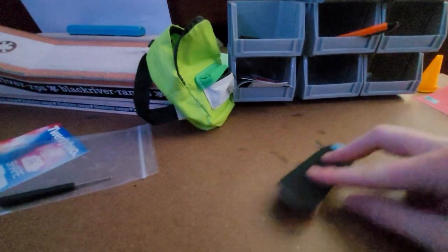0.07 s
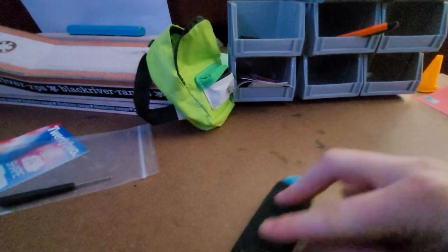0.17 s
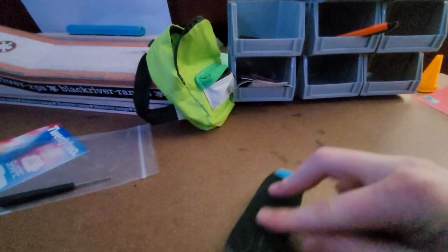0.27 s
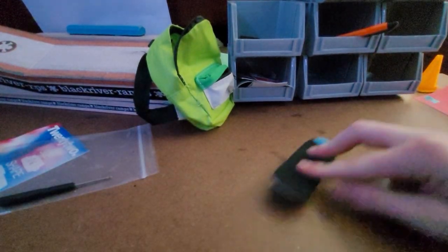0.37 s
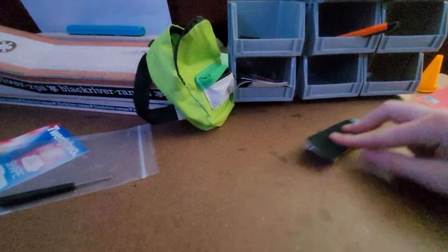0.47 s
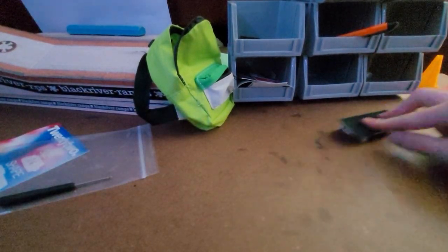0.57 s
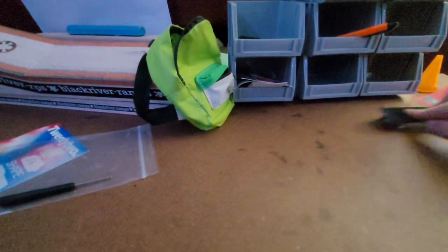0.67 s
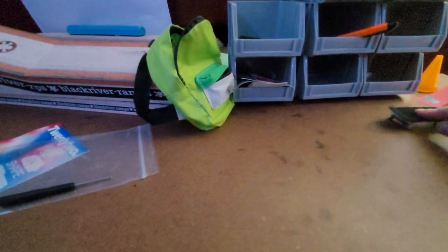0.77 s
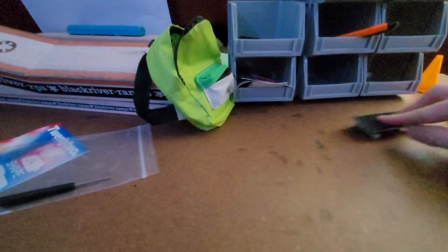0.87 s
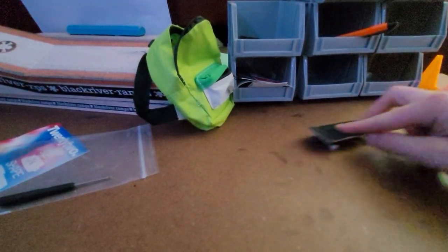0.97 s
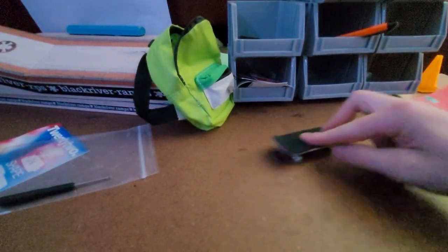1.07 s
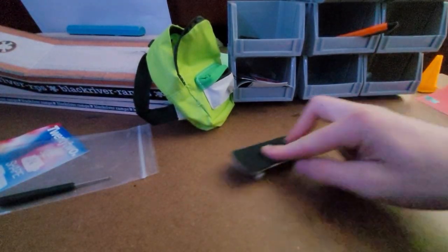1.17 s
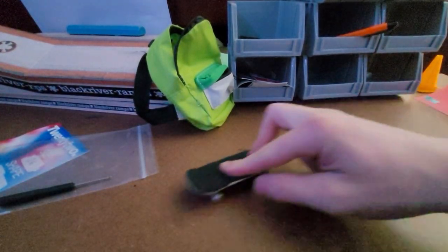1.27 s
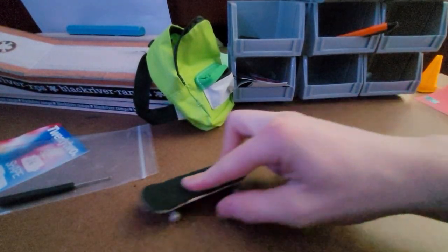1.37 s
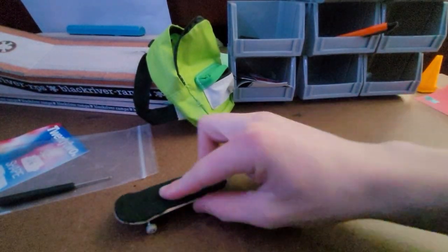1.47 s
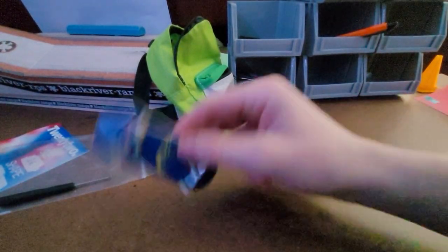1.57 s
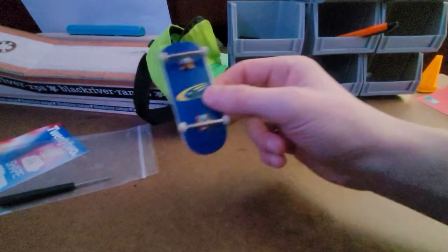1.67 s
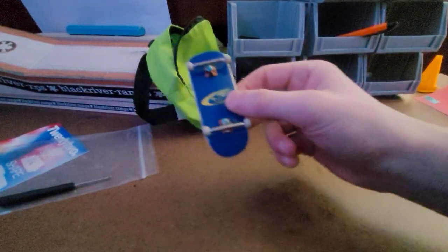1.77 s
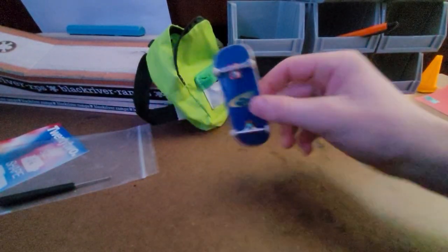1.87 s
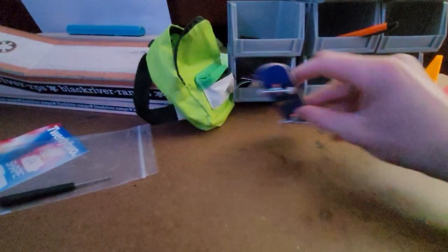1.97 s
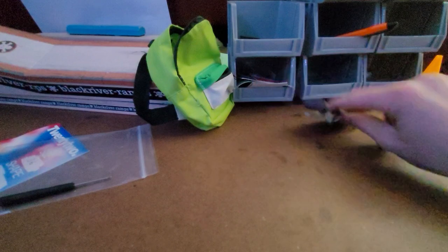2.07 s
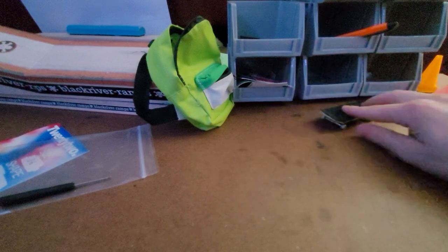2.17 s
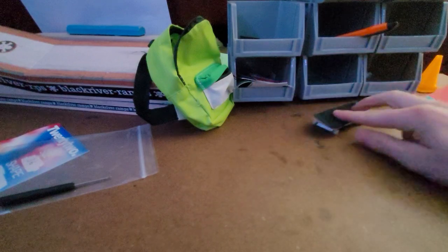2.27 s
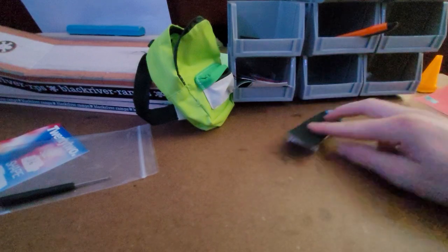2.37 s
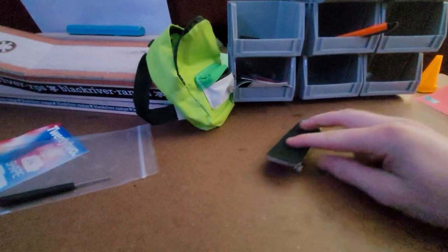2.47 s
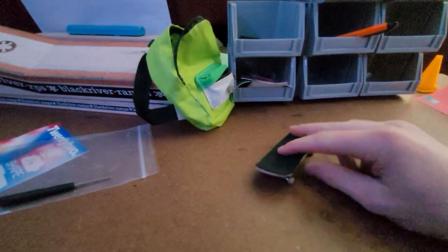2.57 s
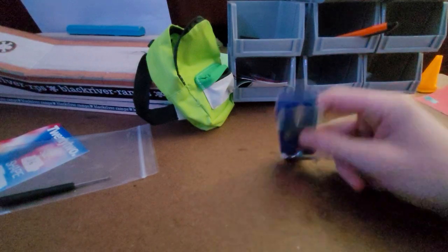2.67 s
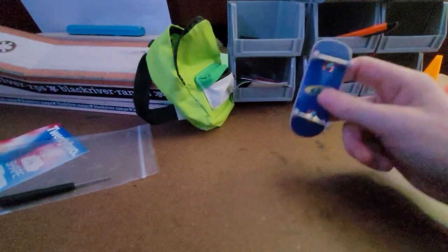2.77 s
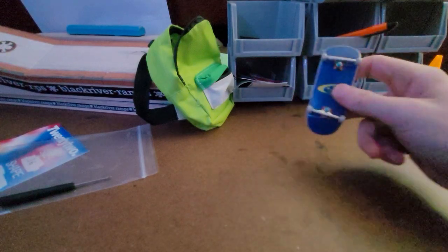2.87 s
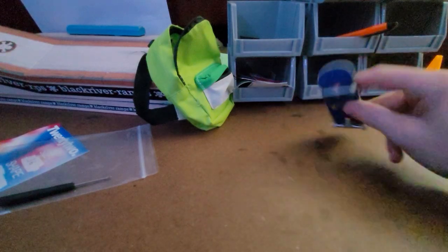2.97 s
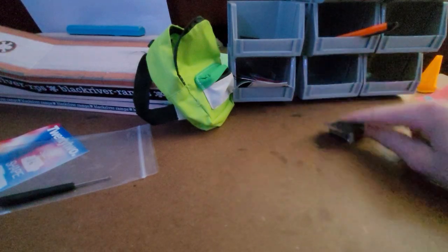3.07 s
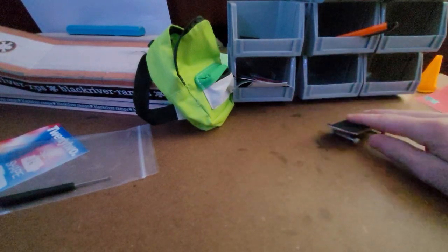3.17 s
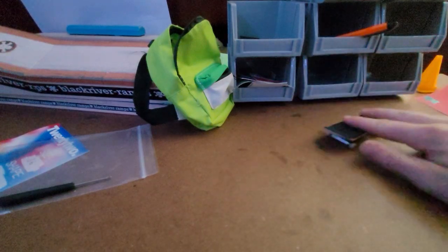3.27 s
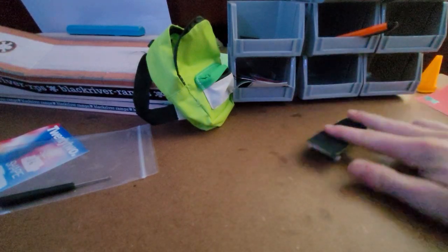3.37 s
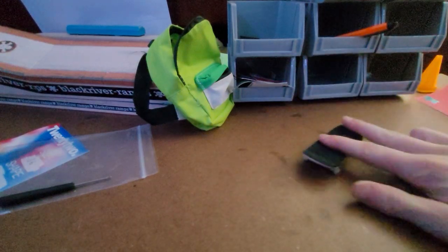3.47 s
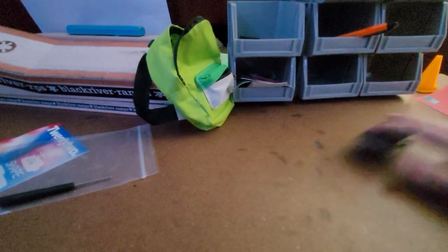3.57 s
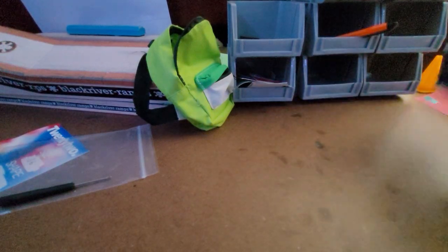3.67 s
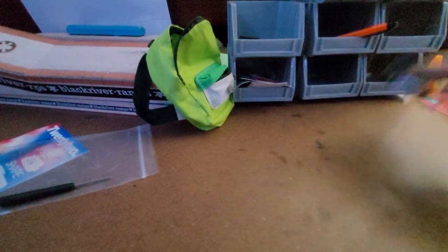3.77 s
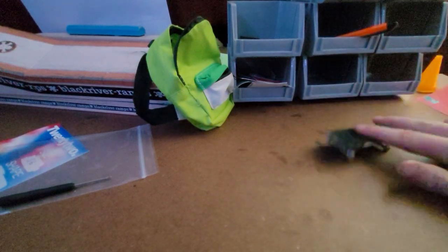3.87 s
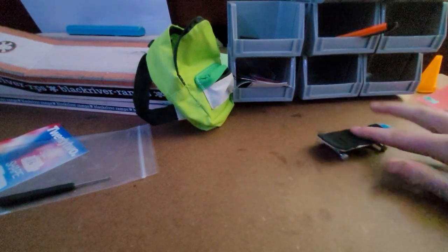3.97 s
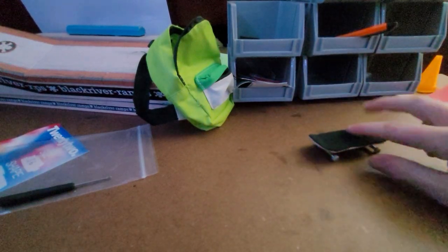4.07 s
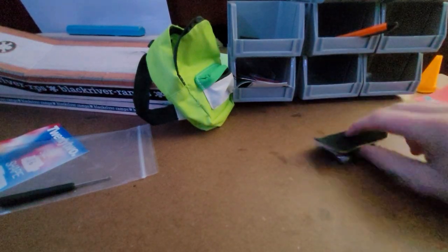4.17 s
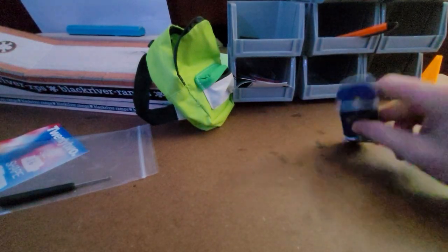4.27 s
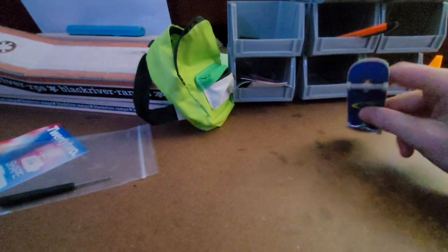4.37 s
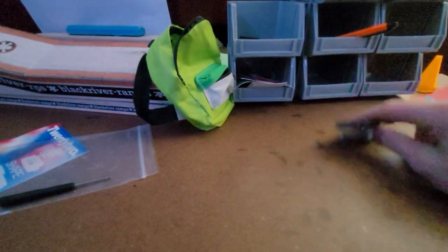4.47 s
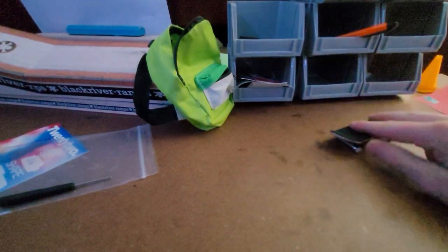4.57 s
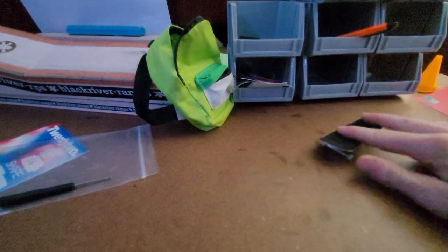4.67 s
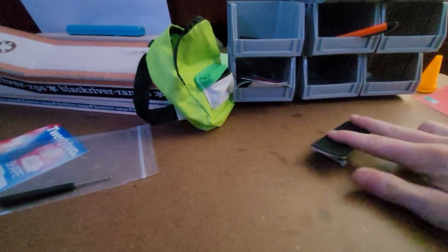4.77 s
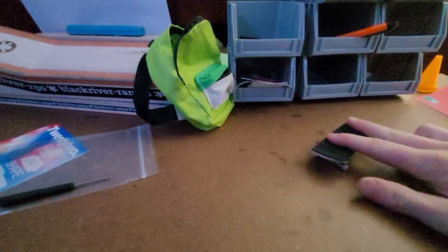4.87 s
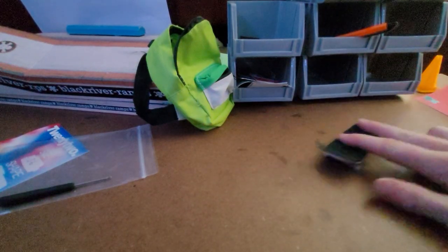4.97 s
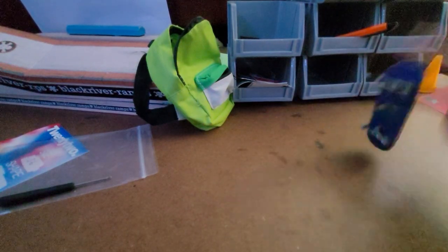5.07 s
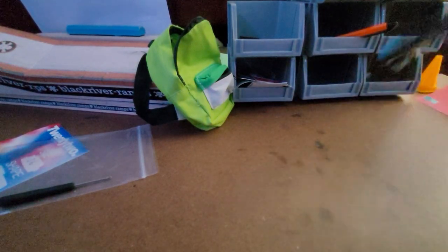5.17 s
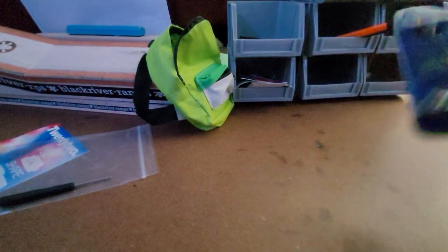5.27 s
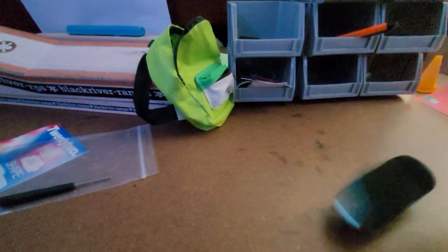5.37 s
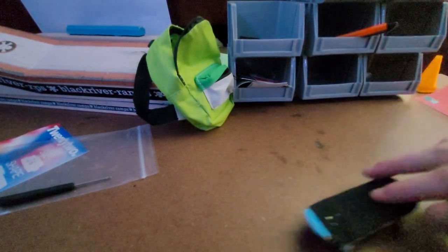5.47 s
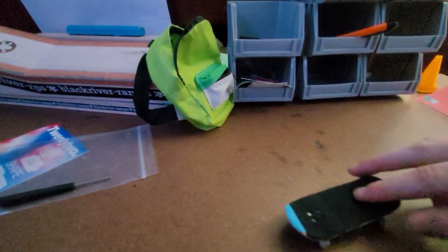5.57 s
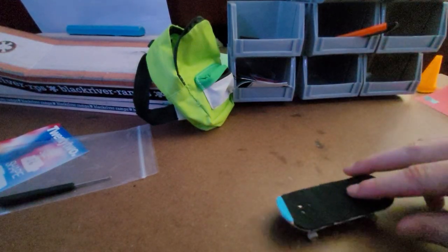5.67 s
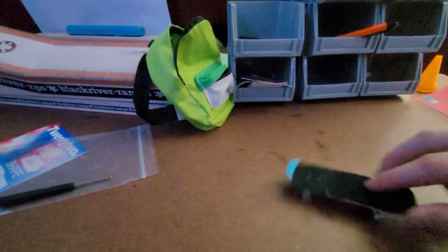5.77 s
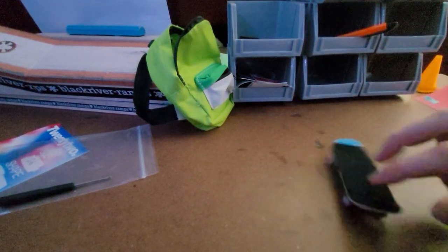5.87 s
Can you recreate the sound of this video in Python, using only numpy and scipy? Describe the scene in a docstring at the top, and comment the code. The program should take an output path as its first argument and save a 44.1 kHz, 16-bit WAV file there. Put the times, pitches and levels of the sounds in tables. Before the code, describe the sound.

A toy skateboard's hard little wheels whirr back and forth over a desk, then its tail pops and it lands with sharp clacks.

```python
"""Fingerboard tricks on a desk

A fingerboard is pushed to and fro on a fibreboard desk in a small room, close to the microphone.
Its hard wheels whirr: shaped noise swells and fades with each stretch of wheel noise, among resonant rasps.
Tail pops, landings, taps and rattles are noise cracks plus decaying modes of desk, wooden deck and metal trucks.
The hand thumps the desk softly in low sines; an appliance hums in steady lines under a bed of room air."""
import sys
import numpy as np
from scipy import signal
from scipy.fft import rfft, irfft, next_fast_len
from scipy.io import wavfile

SR = 44100
rng = np.random.default_rng(int(sys.argv[2]) if len(sys.argv) > 2 else 0)


def wrap_up_sound(samples):
    """Save the sound to the file named by the first command line argument, as 16-bit audio."""
    columns = np.atleast_2d(samples).T
    # keep every value between -1 and 1, then stretch to whole-number steps
    tamed = np.clip(columns, -1, 1)
    steps = np.round(tamed * 32767).astype(np.int16)
    wavfile.write(sys.argv[1], SR, steps)


N = 260229
TIME = np.arange(N) / SR
AGE = TIME[:int(0.4 * SR)]   # time since a blow [s]


def from_db(db):
    """Decibels to gain."""
    return 10 ** (np.asarray(db) / 20)


def rms_one(x, count=None):
    """Scale so that the first count samples have rms 1."""
    return x / np.sqrt(np.mean(x[..., :count] ** 2) + 1e-20)


def at_hz(points, hz):
    """Read a table on a log-frequency axis."""
    table = np.array(points)
    return np.interp(np.log(np.maximum(hz, 1)), np.log(table[:, 0]), table[:, 1])


def pan(balance_db):
    """Left and right gains of constant power; positive leans left."""
    return rms_one(from_db(np.array([[balance_db], [-balance_db]]) / 2))


def band(x, low_hz, high_hz):
    """Causal band-pass."""
    edges = [low_hz, min(high_hz, 0.45 * SR)]
    return signal.sosfilt(signal.butter(2, edges, "band", fs=SR, output="sos"), x)


def add(track, s, sound):
    """Mix a sound in at time s."""
    start = max(int(s * SR), 0)
    track[:, start:start + sound.shape[-1]] += sound[..., :N - start]


def drift(rate):
    """Random wander through knots of spread 1, rate knots a second, joined by straight lines."""
    knots = rng.standard_normal(4096)
    return np.interp(TIME * rate, np.arange(len(knots)), knots)


# likeness of the two sides of a noise: (frequency [Hz], left-right correlation [0 to 1])
LIKENESS = [(50, 0.025), (130, 0.75), (290, 0.8), (640, 0.45), (1400, 0.069), (3000, 0), (16000, 0)]


def stereo_noise(spectrum, size=N):
    """Coloured noise of rms 1, most alike on both sides in the low mids and unrelated in the treble."""
    length = next_fast_len(size)
    hz = np.fft.rfftfreq(length, 1 / SR)
    mid, side = rfft(rng.standard_normal((2, length)))
    alike = np.clip(at_hz(LIKENESS, hz), -1, 1)
    both = np.sqrt(1 + alike) * mid + np.sqrt(1 - alike) * side * [[1], [-1]]
    return rms_one(irfft(both * from_db(at_hz(spectrum, hz)), length)[:, :size])


def dying(t60):
    """Exponential decay from the moment of a blow, 60 dB down after t60 seconds."""
    return from_db(-60 * AGE / t60)


def ringing(modes):
    """One decaying sine for each mode."""
    return np.array([from_db(db) * dying(t60) * np.sin(2 * np.pi * hz * AGE) for hz, db, t60 in modes])


def favoured(modes, centre_hz, octaves):
    """How strongly a blow of a given sharpness reaches each mode."""
    distance = np.log2(np.array(modes)[:, 0] / centre_hz) / octaves
    return 1 / (1 + distance ** 2)


def struck(rings, weight=1, channels=2):
    """Each blow lands on another spot: every mode gets its own size and sign, and its own size on each side."""
    count = len(rings)
    size_db = 3 * rng.standard_normal(count) + 3 * rng.standard_normal((2, count))
    sign = rng.choice([-1, 1], (channels, count))   # one channel: both sides share the sign
    return (weight * from_db(size_db) * sign) @ rings


def crack(low_hz, high_hz, t60, snap_t60=0.0011, snap_db=3):
    """The crush of two hard rough surfaces: a sharp snap on a burst of noise; rms 1 over the first 4 ms."""
    envelope = dying(t60) + from_db(snap_db) * dying(snap_t60)
    noise = rng.standard_normal((2, len(AGE))) * envelope
    return rms_one(band(noise + 1e-18, low_hz, high_hz), count=176)


def clack(ring, low_hz, high_hz, crack_t60, ring_db):
    """A crack and the ring it leaves; rms 1 over the first 4 ms."""
    ring_part = from_db(ring_db) * rms_one(ring, count=176)
    return rms_one(crack(low_hz, high_hz, crack_t60) + ring_part, count=176)


def knock(ring, centre_hz, dent_t60, dent_db, crunch_db):
    """The desk is dented for about one cycle and rings on; rms 1 over the first 10 ms."""
    dent = rms_one(np.sin(2 * np.pi * centre_hz * AGE) * dying(dent_t60), count=441)
    crunch = crack(0.73 * centre_hz, 1.67 * centre_hz, t60=0.12)
    body = rms_one(ring, count=441)
    return rms_one(body - from_db(dent_db) * dent + from_db(crunch_db) * crunch, count=441)


# spectrum of the room air: (frequency [Hz], relative level [dB per Hz])
AIR = [(20, -40), (32, -15), (60, -9), (100, -13), (150, -7), (200, -10.5), (300, -14.5), (450, -14),
       (650, -23), (1000, -27), (1900, -24.5), (4000, -32), (8500, -45.5), (12000, -48), (16000, -48)]
# steady lines of the motor: (frequency [Hz], rms level before the rise and fall below [dB])
HUM = [(75.4, -54), (120, -49), (150, -52.5), (180, -55), (240, -61.5), (270, -55.5), (290.7, -57.5),
       (425.3, -60)]
# slow rise and fall of hum and air together, lower after loud blows: (time [s], gain [dB])
BACKGROUND_DB = [(0, -0.5), (.7, 1), (1.5, 4), (2.15, 3.5), (2.4, 1.5), (3.0, -2.5), (3.6, 3.5),
                 (4.15, -2.5), (5.0, -2), (5.9, 0)]
AIR_DB = -47   # level before this rise and fall


def background():
    """Room air as shaped noise, and a motor hum whose lines waver slightly together in phase."""
    sway = 0.16 * drift(5.9)   # phase of the second line [rad]; the others in proportion to frequency
    hum = 0
    for hz, db in HUM:
        hum = hum + from_db(db) * np.cos(2 * np.pi * hz * TIME + sway * hz / HUM[1][0])
    air = from_db(AIR_DB) * stereo_noise(AIR) * pan(-0.13)
    both = np.sqrt(2) * hum * pan(0.18) + air
    return both * from_db(np.interp(TIME, *np.transpose(BACKGROUND_DB)))


# decay of the room: (frequency [Hz], t60 [s])
ROOM_T60 = [(100, .24), (300, .23), (800, .2), (2000, .24), (5000, .23), (14000, .19)]
# strength of the room: (frequency [Hz], level against the direct sound [dB])
ROOM_DB = [(100, -2.5), (300, -11), (800, -8.5), (2000, -6), (5000, -7), (14000, -8)]
# echoes from nearby boxes and the wall: (delay [s], level [dB])
ECHOES = [(.0028, -13.5), (0.0102, -17.5), (0.0187, -27.5)]


def room(x):
    """A few close bright echoes, and a diffuse noise tail that decays at its own pace in each band."""
    hz = np.fft.rfftfreq(len(AGE), 1 / SR)
    white = rfft(stereo_noise([(20, 0), (20000, 0)], size=len(AGE)))
    centres = np.array(ROOM_T60)[:, 0]
    response = 0
    for (_, t60), share in zip(ROOM_T60, np.eye(len(ROOM_T60))):
        # neighbouring bands crossfade into each other
        part = at_hz(np.column_stack([centres, share]), hz) * from_db(at_hz(ROOM_DB, hz))
        envelope = dying(t60) * (1 - np.exp(-(AGE / 0.0014) ** 2))
        response = response + irfft(white * part, len(AGE)) * envelope / np.linalg.norm(envelope)
    out = x + signal.fftconvolve(x, response, axes=1)[:, :N]
    bright = band(x, 1600, 17000)
    for s, db in ECHOES:
        add(out, s, from_db(db) * bright)
    return out


# soft thumps of the hand: (time [s], peak level before panning [dB], left-right balance [dB])
THUMPS = [(0.048, -31, -9), (0.343, -18, -14), (0.374, -22, -12), (2.79, -22, -9), (3.747, -31, -11),
          (4.256, -26.5, -9), (5.175, -23, -19)]


def thumps(thump_hz, t60, rise_s):
    """Soft flesh moves only the slowest modes of the desk: three low sines that swell in and die."""
    out = np.zeros((2, N))
    modes = [(thump_hz, 0, t60), (128, -1, 0.07), (205, -9, 0.04)]
    sway = ringing(modes).sum(axis=0) * (1 - np.exp(-AGE / rise_s))
    for s, db, balance_db in THUMPS:
        add(out, s, from_db(db) * pan(balance_db) * sway / np.abs(sway).max())
    return out


# rasps of wheels scrubbing sideways, and of the hand on the lifted board:
# (middle [s], half length [s], resonance [Hz], its width [Hz], level at the middle [dB])
RASPS = [(0.257, 0.037, 1580, 700, -36.5), (0.312, 0.04, 3740, 600, -37), (0.484, 0.034, 1360, 350, -32.5),
         (0.491, 0.048, 3380, 1120, -36), (0.5, 0.044, 6000, 4000, -46), (0.788, 0.02, 3900, 3000, -42.5),
         (0.954, 0.02, 3350, 1800, -41), (1.667, 0.0076, 2580, 2600, -39.5), (1.77, .05, 2620, 1500, -50.5),
         (1.12, 0.41, 1710, 900, -49.5), (2.51, 0.079, 1160, 250, -48), (3.701, 0.041, 2430, 1200, -35.5),
         (4.82, 0.067, 2150, 402, -52.5), (5.112, .025, 2500, 1000, -47.5)]


def rasps(chatter_db, chatter_rate):
    """A dragged surface sticks and slips: noise of jumpy level rasps in one resonance."""
    out = np.zeros((2, N))
    for s, half_s, hz, width_hz, db in RASPS:
        slips = rng.standard_normal((2, N)) * from_db(chatter_db * drift(chatter_rate))
        resonance = signal.iirpeak(hz, hz / width_hz, fs=SR)
        rasp = signal.lfilter(*resonance, band(slips, hz / 1.8, hz * 1.38))
        out += from_db(db) * rms_one(rasp) * np.exp(-((TIME - s) / half_s) ** 2 / 2)
    return out


# each stretch of wheel noise: pushes, a scrape as the board is lifted, wheels spinning freely:
# (start [s], speeding up [s], running [s], slowing [s], rumble level [dB], brightness [dB])
STRETCHES = [(-0.13, 0.38, .04, 0.18, -36.5, -.5), (0.405, 0.04, 0.37, 0.054, -37.5, -.5),
             (0.895, 0.074, .03, .66, -34.5, -1.5), (1.635, .035, .005, .02, -45, 7),
             (1.691, 0.025, 0.058, 0.35, -50, 2.5), (2.385, 0.088, 0.053, 0.16, -42.5, 3.5),
             (2.69, 0.07, 0.022, .02, -47, 2), (3.06, 0.15, .02, 0.044, -55.5, 8.5),
             (3.39, 0.098, 0.076, 0.061, -43, 1), (3.6, .11, 0.02, 0.018, -38.5, 7),
             (4.26, 0.044, 0.053, 0.024, -58, 8), (4.68, .05, .13, .1, -55.5, 2),
             (5.06, .05, 0.028, 0.11, -48.5, 4.5), (5.62, .05, 0.093, .08, -51.5, -12),
             (5.83, 0.063, .02, .04, -44.5, -0.5)]
SPEED_POWER = 0.71   # loudness grows as this power of speed
FLOOR_DB = -56   # faint steady noise floor under the stretches
WHIRR_DB, HISS_DB = -5.5, -13   # against the rumble
HISS_FOLLOWS = 1.5   # dB of hiss for each dB of brightness


def wheel_levels():
    """Gains of rumble, whirr and hiss: all follow the speed, the upper two also the brightness."""
    power = from_db(FLOOR_DB) ** 2
    for start, rise_s, run_s, slow_s, db, bright_db in STRETCHES:
        corners = start + np.cumsum([0, rise_s, run_s, slow_s])
        speed = np.interp(TIME, corners, [0, 1, 1, 0])
        tops = from_db(db + bright_db * np.array([0, 1, HISS_FOLLOWS]))
        power = power + np.outer(tops, speed ** SPEED_POWER) ** 2
    return np.sqrt(power) * from_db([[0], [WHIRR_DB], [HISS_DB]])


# spectra of the wheel noise, low, middle and high: (frequency [Hz], relative level [dB per Hz])
RUMBLE = [(40, -25), (120, -5), (270, 0.5), (380, 2.5), (500, 3), (720, -1.5), (1050, -1), (1350, -2),
          (1800, -6.5), (2300, -65), (4000, -46)]
WHIRR = [(1300, -43), (1900, 1), (2250, 1), (2650, 0), (3200, -3.5), (3800, -4), (4700, -3.5), (5700, -9.5),
         (6900, -7.5), (9000, -19.5)]
HISS = [(5000, -10.5), (7000, -9.5), (8800, -5), (10300, -0.5), (12500, 0), (16000, -5.5)]


def wheels(grain_db, grain_rate, wander_db, hiss_left_db):
    """Wheels run over the desk's grain: three noises of rough level, in which resonances wander."""
    grain = from_db(grain_db * drift(grain_rate))
    balances = (pan(0), pan(0.98), pan(hiss_left_db))
    out = 0
    for spectrum, level, gains in zip((RUMBLE, WHIRR, HISS), wheel_levels(), balances):
        noise = stereo_noise(spectrum)
        coloured = noise
        # short echoes inside the desk, of changing strength, carve moving peaks
        for lag in rng.integers(25, 260, 4):
            coloured = coloured + (from_db(wander_db) - 1) * drift(6) * np.roll(noise, lag, axis=1)
        out = out + rms_one(coloured * grain) * gains * level
    return out


# loose trucks and wheels rattling as the board settles:
# (start [s], length [s], typical level of one small clack [dB])
RATTLES = [(2.241, 0.037, -34.5), (3.958, 0.051, -35.5), (4.028, 0.0052, -31), (5.492, 0.021, -36.5),
           (5.53, 0.0294, -33.5), (5.604, 0.017, -30)]


def rattles(per_s, deck_db, tick_db, tick_left_db):
    """Play in the axles gives a quick uneven run of small clacks of wood, metal and tick."""
    out = np.zeros((2, N))
    deck, trucks = ringing(DECK), ringing(TRUCKS)
    for start, length_s, db in RATTLES:
        for k in range(16):
            delay = (k + rng.random()) / per_s
            wood = clack(struck(deck), 690, 3300, crack_t60=0.0082, ring_db=-15.0)
            metal = clack(struck(trucks), 3100, 8500, crack_t60=0.0064, ring_db=-4.5)
            tick = crack(10450, 14700, t60=0.02) * pan(tick_left_db)
            # clacks past the end of the run are silent
            inside = np.clip((length_s - delay) * per_s, 0, 1)
            size = from_db(db + 2 * rng.standard_normal()) * inside
            add(out, start + delay, size * (from_db(deck_db) * wood + metal + from_db(tick_db) * tick))
    return out


# modes of desk top, wooden deck, and trucks with axles: (frequency [Hz], relative level [dB], t60 [s])
DESK = [(74, -19, 0.31), (108, 0, 0.17), (143.4, 9, 0.063), (166.6, -16.5, 0.15), (241.8, -4, 0.15),
        (268, -1.5, 0.12), (287.5, -2.5, 0.12), (373.2, -1, 0.079), (409, -8, 0.058), (450, -9.5, 0.088),
        (492, -5.5, 0.12), (562, -3.5, 0.05), (624, -0.5, 0.045), (670, -4, 0.048), (746, -8.5, 0.033),
        (872, -19.5, 0.071), (937, -13.5, 0.068)]
DECK = [(1120, -23, 0.093), (1379, 11.5, 0.045), (1630, -1.5, 0.017), (1714, 8, 0.03), (2080, -10, 0.33),
        (2099, 0.5, 0.076), (2430, -14, 0.08), (2330, -19, 0.026), (2800, -2, 0.059)]
TRUCKS = [(3050, -7, 0.0049), (3930, 0, 0.11), (4155, 10, 0.044), (4680, 2, 0.073), (5220, -30, 0.013),
          (6000, -28, 0.013), (7010, 11, 0.02), (7320, -30, 0.092), (7600, 4, 0.043)]
DECK_HZ, DECK_SCATTER_OCTAVES = 1903, 0.13   # centre of the deck's clack, and its spread between blows
TICK_LEFT_DB = 10.5   # the tick leans left


def blow(desk_db, knock_hz, deck_db, trucks_db, tick_db):
    """Every contact excites desk, deck and trucks, with a bright tick on top."""
    deck_hz = DECK_HZ * 2 ** (DECK_SCATTER_OCTAVES * rng.standard_normal())
    desk_ring = struck(ringing(DESK), favoured(DESK, knock_hz, octaves=0.92), channels=1)
    low = knock(desk_ring, knock_hz, dent_t60=0.013, dent_db=-8.5, crunch_db=-10.5)
    deck_ring = struck(ringing(DECK), favoured(DECK, deck_hz, octaves=0.33))
    wood = clack(deck_ring, deck_hz / 1.38, deck_hz * 1.3, crack_t60=0.025, ring_db=-7.5)
    metal = clack(struck(ringing(TRUCKS)), 3500, 7900, crack_t60=0.0096, ring_db=-10.5)
    tick = crack(9800, 15600, t60=0.013) * pan(TICK_LEFT_DB)
    board = from_db(deck_db) * wood + from_db(trucks_db) * metal + from_db(tick_db) * tick
    return from_db(desk_db) * low + board


# lasting modes of the board in the air: (frequency [Hz], relative level [dB], t60 [s])
FREE_BOARD = [(1980, 2, 0.15), (2083, -21, 0.1), (2400, 7, 0.16), (2580, -11, 0.12), (4100, -11, 0.19),
              (4150, -6.5, 0.06), (4450, -1, 0.17), (6220, 7, 0.067), (6600, 0, 0.11), (7060, 7, 0.18),
              (7300, -3, .16)]


def free_ring(db):
    """In the air nothing damps deck and axles, so a few modes last longer."""
    return from_db(db) * rms_one(struck(ringing(FREE_BOARD)), count=441)


# the tail is snapped against the desk:
# (time [s], desk [dB], deck [dB], trucks [dB], tick [dB], lasting ring [dB])
POPS = [(2.787, -25, -26.5, -24, -23.5, -44), (3.743, -15.5, -22.5, -22.5, -21, -34.5),
        (4.404, -27.5, -29, -35.5, -43, -57), (5.173, -21, -23.5, -22.5, -18.5, -30)]
# a truck lands, one wheel ahead of the other; desk level is the second wheel's, the rest the first's:
# (time [s], lag of the second wheel [s], knock centre [Hz], desk [dB], deck [dB], trucks [dB], tick [dB])
LANDINGS = [(2.196, 0.01, 260, -25.5, -25, -31, -23), (2.218, .001, 330, -21, -29, -26.5, -22.5),
            (2.236, 0.011, 310, -18.5, -36, -25.5, -26), (3.1556, 0.00091, 298, -34, -27.5, -32.5, -29),
            (3.216, 0.00093, 336, -28, -37, -27.5, -24), (3.959, 0.0058, 290, -24, -33, -35, -30),
            (3.9655, 0.0082, 306, -19, -33, -28.5, -24), (3.982, 0.0011, 310, -23, -42, -26.5, -22.5),
            (4.028, 0.0027, 333, -22, -33, -26.5, -22.5), (4.5795, 0.0069, 326, -28.5, -27.5, -35, -27),
            (4.6275, 0.001006, 410, -29, -28, -27.5, -22.5),
            (5.4862, 0.0013, 466, -14.5, -18.5, -24, -26.5), (5.524, 0.0019, 417, -19, -23, -24.5, -18.5),
            (5.5424, 0.00074, 340, -23, -27, -31, -19), (5.603, 0.00091, 386, -21.5, -36, -37, -31),
            (5.6082, 0.0034, 370, -24.5, -35, -28.5, -19.5)]
# single wheels touch down, rebound or lift off: (time [s], desk [dB], deck [dB], trucks [dB], tick [dB])
TAPS = [(0.3757, -43, -39.5, -47, -46), (1.668, -55, -32.5, -48, -42.5), (1.717, -44.5, -44, -49, -65),
        (2.431, -48, -40.5, -48, -39), (2.762, -41, -39, -38, -45), (3.3906, -33, -34, -39, -35.5),
        (4.254, -39, -50, -59, -52), (4.6508, -40, -54, -34, -41), (4.68, -32.5, -41, -39.5, -34.5),
        (5.182, -25.5, -33, -26, -30), (5.502, -25.5, -27, -40, -46), (5.595, -48, -38, -36, -40)]
# the first wheel barely knocks the desk, the second clacks less
FIRST_WHEEL_DB, SECOND_WHEEL_DB = -11, -5
POP_KNOCK_HZ, WHEEL_KNOCK_HZ = 485, 326   # the hard tail knocks higher than a wheel


def tricks():
    """Pops leave the board ringing; landings clack, then knock as the weight comes down; taps touch once."""
    out = np.zeros((2, N))
    for s, desk_db, *board_db, ring_db in POPS:
        add(out, s, blow(desk_db, POP_KNOCK_HZ, *board_db) + free_ring(ring_db))
    for s, lag_s, knock_hz, desk_db, *board_db in LANDINGS:
        add(out, s, blow(desk_db + FIRST_WHEEL_DB, knock_hz, *board_db))
        add(out, s + lag_s, blow(desk_db, knock_hz, *np.add(board_db, SECOND_WHEEL_DB)))
    for s, desk_db, *board_db in TAPS:
        add(out, s, blow(desk_db, WHEEL_KNOCK_HZ, *board_db))
    return out


def scene():
    """Board, hand and background together; only the clatter goes through the room."""
    bed = background()
    hand = thumps(thump_hz=83.5, t60=0.1, rise_s=0.0027)
    rolling = wheels(grain_db=1.5, grain_rate=300, wander_db=3.0, hiss_left_db=13.0)
    rolling = rolling + rasps(chatter_db=3.5, chatter_rate=160)
    # wheels that are not quite round press unevenly on the desk
    rolling = rolling * from_db(0.73 * drift(70))
    clatter = tricks() + rattles(per_s=300, deck_db=2.5, tick_db=-0.5, tick_left_db=2)
    return room(clatter) + hand + rolling + bed


def record(dry):
    """The microphone drops the deepest bass and rounds the highest peaks; the top is cut at 16 kHz."""
    heard = signal.sosfilt(signal.butter(4, 42, "high", fs=SR, output="sos"), dry)
    heard = heard / (1 + (heard / 0.8) ** 6) ** (1 / 6)
    return signal.sosfilt(signal.ellip(10, 0.2, 80, 16000, fs=SR, output="sos"), heard)


dry = scene()
out = record(dry)
wrap_up_sound(out)
```